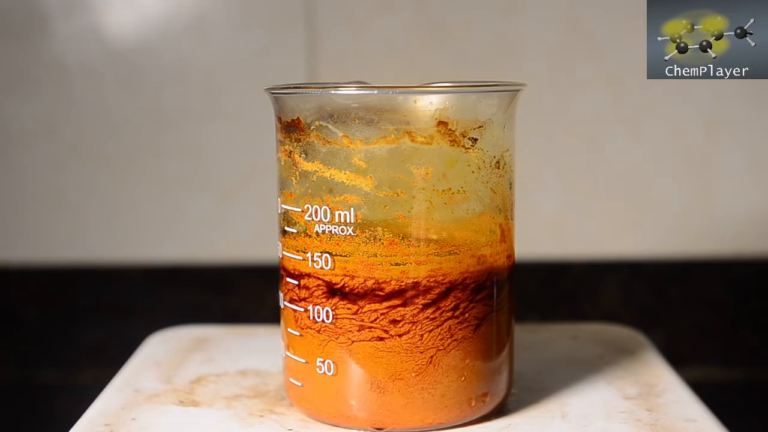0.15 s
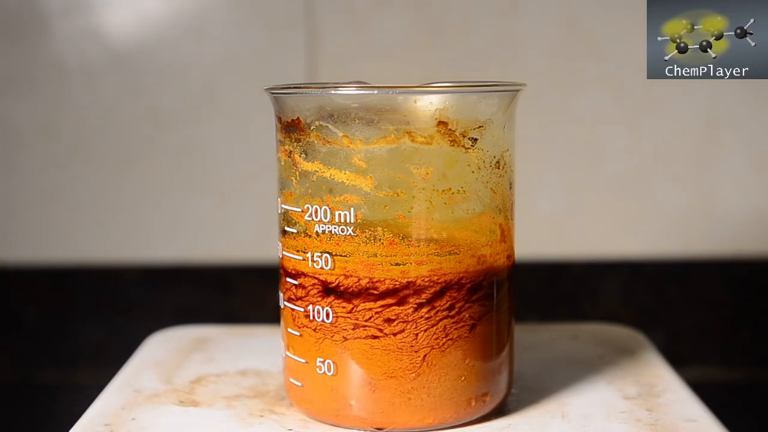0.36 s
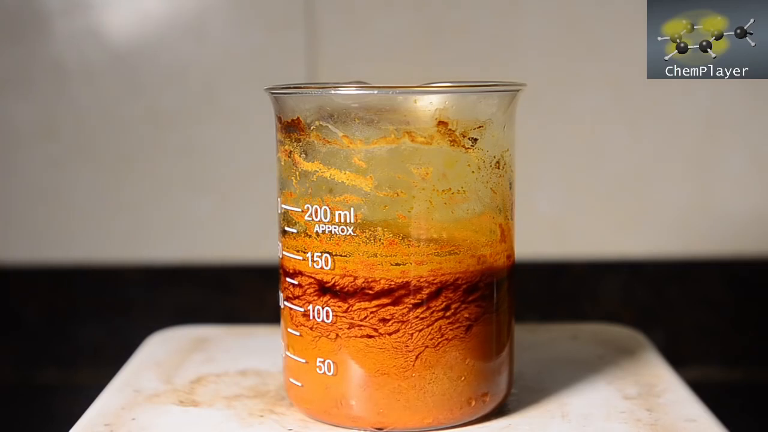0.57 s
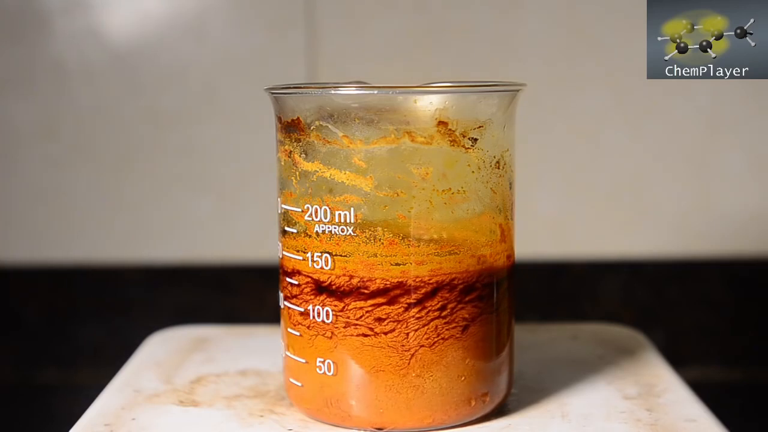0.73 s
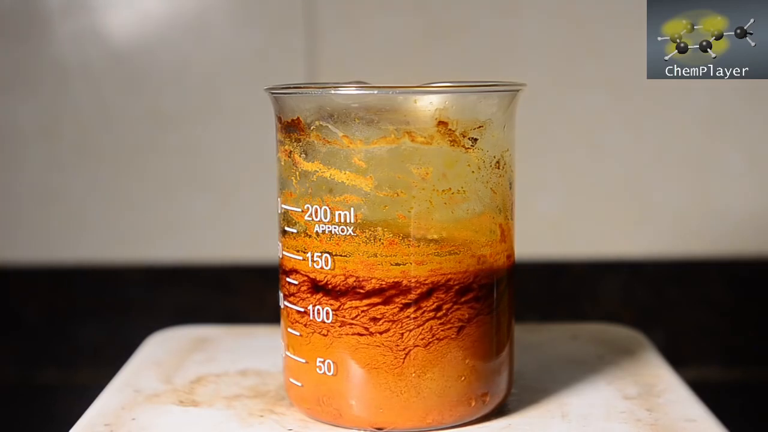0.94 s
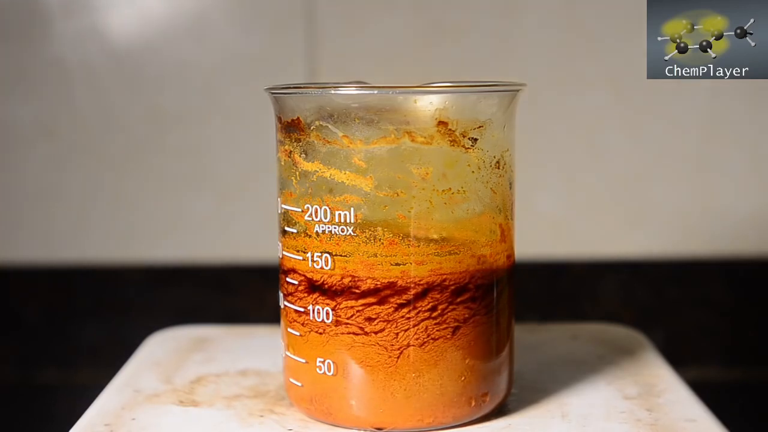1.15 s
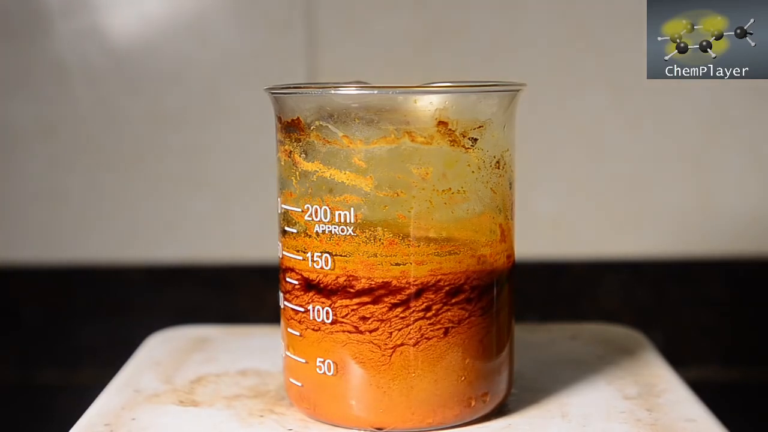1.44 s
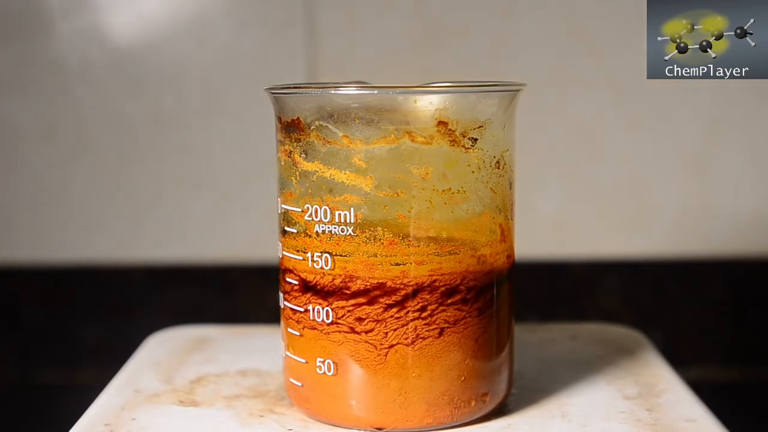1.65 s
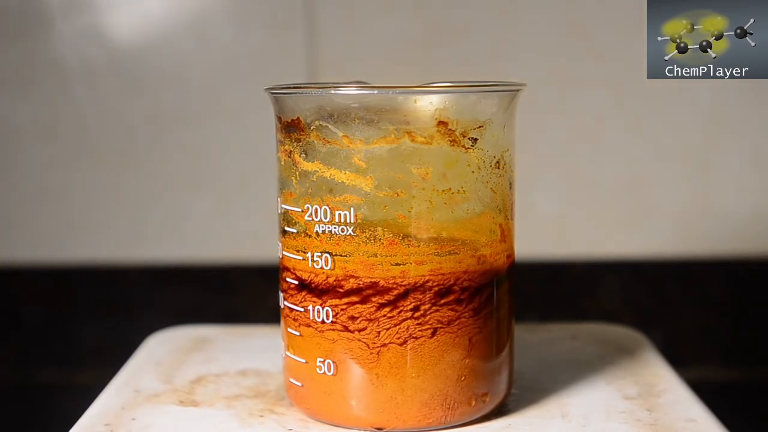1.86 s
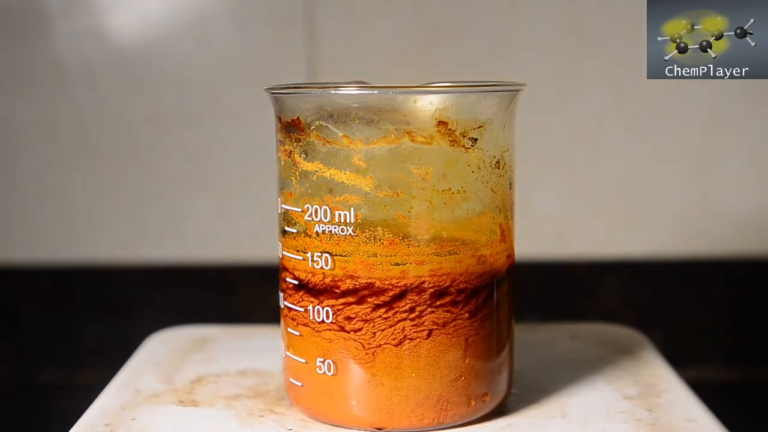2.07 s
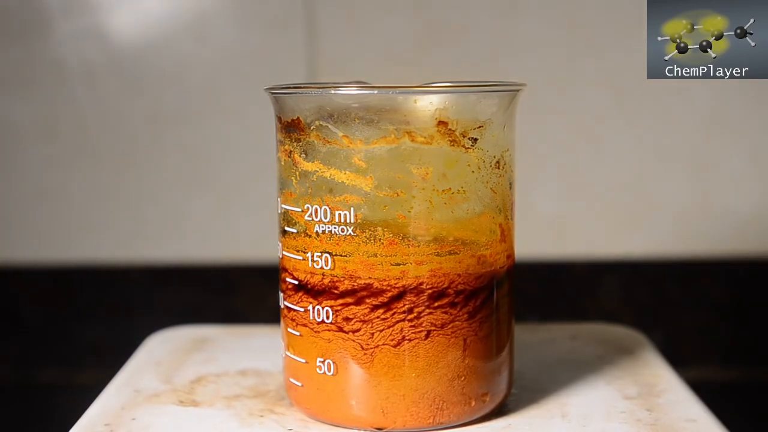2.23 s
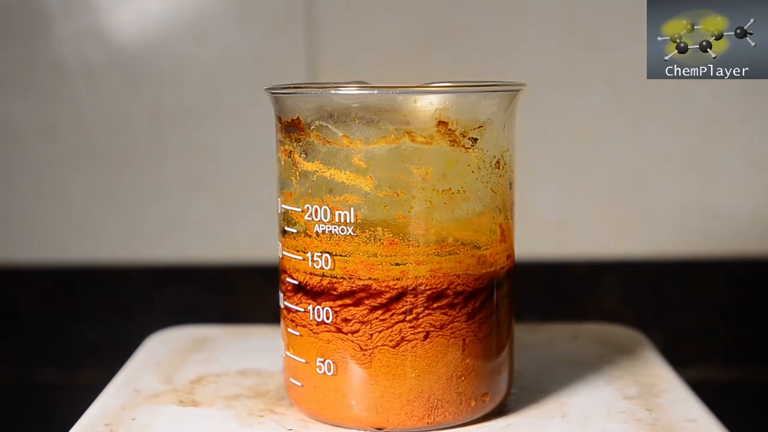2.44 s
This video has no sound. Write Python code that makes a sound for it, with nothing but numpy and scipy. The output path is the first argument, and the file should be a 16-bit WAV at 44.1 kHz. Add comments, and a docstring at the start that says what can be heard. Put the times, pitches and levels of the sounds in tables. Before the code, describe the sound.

Bubbles plop irregularly in a thick liquid in a glass beaker, with faint ticks on the glass and a stirrer motor whirring softly. The motor fades, then one sharp switch click rings briefly in the small room.

```python
"""Bubbles plop in a thick liquid as a magnetic stirrer churns it in a glass beaker on a lab bench.
Each bubble rings briefly and excites the hollow above the liquid; the stir bar ticks on the glass.
The motor whirrs and hums in its housing and its speed control buzzes at twice the mains rate.
Both ease off near the end, where one sharp, switch-like click rings into the small room."""
import sys
import numpy as np
from scipy import signal
from scipy.fft import rfft, irfft, next_fast_len
from scipy.io import wavfile
from scipy.ndimage import map_coordinates

SR = 44100
rng = np.random.default_rng(int(sys.argv[2]) if len(sys.argv) > 2 else 0)


def inscribe(sig):
    """Save sig as 16-bit PCM at rate SR to the path in sys.argv[1].

    A 1-D sig is mono; a 2-D sig holds one channel per row.
    Samples are clipped to [-1, 1] before scaling.
    """
    pcm = np.round(np.clip(np.atleast_2d(sig).T, -1, 1) * 32767)
    wavfile.write(sys.argv[1], SR, pcm.astype(np.int16))


N = 114660


def bubbles():
    """Bubble resonance: each rings with slightly rising pitch and, opening, excites the beaker's hollow."""
    # bubbles: t/s, f/Hz, tone level/dB, lifetime/s, level of the gulp on opening/dB
    plops = [(.001, 970, -30, 0.0085, -36.5), (.135, 1005, -38, 0.0074, -52),
             (.2885, 988, -27, 0.0057, -44), (.54, 1050, -38.5, 0.0061, -39.5),
             (0.564, 1070, -42, .005, -50), (0.6171, 1053, -27.5, 0.0066, -33.5),
             (.722, 1060, -42.5, 0.0065, -58), (.843, 1005, -40, 0.006, -51), (.943, 1070, -41, .005, -53),
             (1.3145, 1060, -31, 0.0053, -37.5), (1.365, 1070, -40.5, 0.0085, -37.5),
             (1.388, 1061, -35.5, 0.016, -43), (1.409, 960, -34, .004, -48), (1.4384, 975, -32, 0.006, -41),
             (1.7315, 1060, -29.5, 0.008, -36), (1.824, 1040, -33, 0.0076, -45),
             (1.842, 980, -38.5, 0.0048, -39), (1.855, 980, -37, 0.0053, -40),
             (1.876, 990, -36, 0.0067, -38), (1.929, 1030, -44, 0.0091, -38.5),
             (1.99, 1000, -43.5, 0.01, -39.5), (2.047, 1600, -47, 0.012, -50),
             (2.066, 613, -42.5, 0.0088, -51), (2.076, 500, -38.5, 0.0083, -47),
             (2.144, 574, -37.5, 0.0054, -49), (2.161, 524, -45, 0.011, -52),
             (2.2313, 1040, -37, 0.0063, -33.5), (2.252, 760, -41, 0.0067, -49),
             (2.339, 910, -45, 0.0068, -45)]
    # modes of the hollow above the liquid: f/Hz, level/dB, T60/s
    cavity_modes = [(527, -7, 0.063), (802, -9, .05), (1316, -6, 0.026), (1613, -3, 0.043),
                    (1840, -10, .025), (2230, -12, 0.023)]
    attack_s, rise_per_s = 0.00073, 2.5
    out, t = np.zeros(N), np.arange(SR // 10) / SR
    onset = 1 - np.exp(-t / attack_s)
    for start, hz, db, life, gulp_db in plops:
        phase = 2 * np.pi * hz * t * (1 + rise_per_s * (t - life) / 2)
        tone = amp(db) * np.sin(phase) * np.exp(-(t / life) ** 2.5)
        gulp = amp(gulp_db - 2) * ring(cavity_modes, t)
        add(out, start, onset * (tone + gulp))
    return out


def stir_bar():
    """Impact excitation: the bar taps the liquid-damped glass, at times with a fine wet spit."""
    # taps: t/s, glass level/dB, contact noise level/dB, spit level/dB
    taps = [(.138, -51.5, -62, -80), (.539, -54, -52, -70), (.632, -64, -60, -59), (.7195, -56, -65, -80),
            (.985, -54, -55, -80), (1.009, -49, -52, -75), (1.219, -57, -48.5, -70),
            (1.243, -53.5, -59, -80), (1.5145, -45.5, -49, -75), (1.855, -62, -55, -58),
            (1.928, -50, -51, -70), (1.989, -62, -51, -66), (2.027, -57, -51, -80),
            (2.294, -56, -48.5, -70), (2.328, -63, -52, -62)]
    # modes of the beaker: f/Hz, level/dB, T60/s
    glass_modes = [(2014, -8, 0.13), (2320, 1, 0.085), (2830, -3, 0.035), (3500, -8, 0.024),
                   (3950, -5, 0.019), (5140, -27, 0.019)]
    # contact noise: f/Hz, spectral level/dB
    contact_spectrum = [(300, -15), (900, 5), (2400, -4), (3700, 1), (4500, -10), (8000, -34), (14000, -45)]
    # wet spit: f/Hz, spectral level/dB
    spit_spectrum = [(2500, -20), (5200, 0), (8000, -1), (12000, -12), (15000, -25)]
    attack_s, contact_t60_s = 0.00034, 0.023
    out, t = np.zeros(N), np.arange(SR // 10) / SR
    onset = 1 - np.exp(-t / attack_s)
    contact, spit = noise(contact_spectrum), noise(spit_spectrum)
    for start, glass_db, contact_db, spit_db in taps:
        burst = (amp(contact_db) * contact + amp(spit_db) * spit)[round(start * SR):][:len(t)]
        crack = burst * amp(-1 - 60 * t / contact_t60_s)
        glass = amp(glass_db) * ring(glass_modes, t)
        add(out, start, onset * (glass + crack))
    return out


def switch_click():
    """Impact and rebound: a switch snaps over with a bright snap, a broad crack and a ringing case."""
    # the blow and its faint rebound: t/s, level/dB
    blows = [(2.408, -19.5), (2.4535, -42)]
    # first snap: f/Hz, spectral level/dB
    snap_spectrum = [(300, -30), (1500, -0.5), (2300, 2.5), (3200, -2.5), (5000, -2.5), (7000, -6),
                     (9000, -9), (10500, -0.5), (11600, -9), (12500, -15), (14500, -20), (15500, -30)]
    # longer crack: f/Hz, spectral level/dB
    crack_spectrum = [(200, -44), (330, -26), (500, -13), (850, -1), (1600, -7), (2000, 2.5), (2550, 8),
                      (3000, -4), (4000, 2.5), (5800, -2), (6600, -4.5), (8000, -3.5), (9000, -11),
                      (10200, -3), (11500, -7.5), (12300, -15), (14400, -23), (15500, -40)]
    # modes of the case: f/Hz, level/dB, T60/s
    case_modes = [(508.4, -13, 0.18), (870, -7, 0.057), (1420, -11, 0.07), (1957, -7.5, 0.047),
                  (2190, -6, 0.074), (2336, -9, 0.088), (2442, -5.5, 0.065), (2600, -8.5, 0.062),
                  (2958, -17.5, 0.18), (3330, -24, 0.24), (3500, -20.5, 0.14), (3860, -7, 0.064),
                  (4550, -17, 0.046), (4968, -22, 0.049), (5410, -14, 0.033), (5570, -14, 0.065)]
    attack_s, snap_t60_s, crack_t60_s = 0.00041, 0.011, 0.054
    out, t = np.zeros(N), np.arange(SR // 4) / SR
    onset = 1 - np.exp(-t / attack_s)
    for start, db in blows:
        snap = noise(snap_spectrum)[:len(t)] * amp(6.5 - 60 * t / snap_t60_s)
        crack = noise(crack_spectrum)[:len(t)] * amp(-1.5 - 60 * t / crack_t60_s)
        case = amp(-3) * ring(case_modes, t)
        add(out, start, amp(db) * onset * (snap + crack + case))
    return out


def motor_whirr():
    """Forced vibration: grainy bearing noise drives the housing's resonances, beside a broad rub."""
    # envelope of the drive: t/s, level/dB
    drive_level = [(0, -52), (1.08, -51.5), (1.55, -51.5), (1.78, -52), (1.92, -54), (2.23, -61.5),
                   (2.38, -72)]
    # housing resonances: f/Hz, bandwidth/Hz, level/dB
    housing_modes = [(420, 33, -5.5), (548.5, 19, 5.5), (808.5, 47, 3.5), (950, 29, -9.5), (1075, 37, -3.5),
                     (1327, 82, -5.5), (1482, 96, -1.5), (1599, 35, 0), (1870, 106, -10),
                     (2044, 190, -10.5), (2293, 24, -5.5), (2637, 114, -12)]
    # rub of the drive: f/Hz, spectral level/dB
    rub_spectrum = [(200, -4), (700, -11), (1150, -10), (1300, 2.5), (1700, 1), (2300, -4), (2450, -12.5),
                    (2750, -13), (3500, -17.5), (5500, -24.5), (9000, -63)]
    housing = lambda f: sum(amp(db) * resonance(f, hz, width) for hz, width, db in housing_modes)
    grains = rng.standard_normal(N) * amp(2 * wobble(150))
    whirr = amp(1) * unit(filtered(grains, housing))
    rub = amp(-6.5) * noise(rub_spectrum)
    return amp(curve(drive_level)) * (whirr + rub)


def motor_hum():
    """Superposition: the motor's hum is a sum of tones, each wavering in level and phase."""
    # envelope of the hum: t/s, level/dB
    hum_level = [(0, 1), (1.68, 0.5), (1.75, -6), (1.95, -16), (2.6, -20)]
    # line spectrum: f/Hz, level/dB
    lines = [(50.2, -82), (150.7, -77), (200.9, -74), (401.8, -75), (602.8, -78), (703.3, -61.5),
             (820, -63), (1415, -64)]
    waver_db, waver_rad = 1, 0.4
    hum, t = np.zeros(N), np.arange(N) / SR
    for hz, db in lines:
        peak = np.sqrt(2) * amp(db + waver_db * wobble(8))
        hum += peak * np.sin(2 * np.pi * hz * t + waver_rad * wobble(8.5))
    return amp(curve(hum_level)) * hum


def speed_control():
    """Periodic excitation: switching pulses ping a coil in each mains half cycle, with a swell of hiss."""
    # load on the control: t/s, level/dB
    load_level = [(0, 1), (1.65, 0), (1.85, -2), (2.0, -5), (2.6, -5)]
    # pulses within one half cycle: delay/s, level/dB
    pulse_group = [(0, 0), (.0034, -10.5), (.0068, -10)]
    # coil resonances: f/Hz, bandwidth/Hz, level/dB, share of the load curve followed (0-1)
    coil_modes = [(3600, 300, -76.5, .3), (7240, 103, -75, 0), (10680, 420, -74.5, 1), (14360, 180, -93, 0)]
    # electrical hiss: f/Hz, spectral level/dB
    hiss_spectrum = [(2000, -8), (3500, -8.5), (4800, -1), (5700, -19), (6500, -14), (9000, -21),
                     (10300, -10), (11300, -12), (13000, -28)]
    mains_hz, first_pulse_s, jitter_s, scatter_db = 50.23, .0026, .00004, 2
    starts = np.arange(first_pulse_s, N / SR, 1 / (2 * mains_hz))
    pulses = np.zeros(N + SR)
    for delay, db in pulse_group:
        times = starts + delay + jitter_s * rng.standard_normal(len(starts))
        pulses[np.round(times * SR).astype(int)] += amp(db + scatter_db * rng.standard_normal(len(starts)))
    coil, load_db = np.zeros(N), curve(load_level)
    for hz, width, db, share in coil_modes:
        two_bandpasses = lambda f: (1.5j * width * f / (hz * hz - f * f + 1.5j * width * f)) ** 2
        coil += amp(db + share * load_db) * unit(filtered(pulses, two_bandpasses))
    cycle = np.cos(4 * np.pi * mains_hz * (np.arange(N) / SR - first_pulse_s))
    hiss = unit(np.exp(.7 * cycle) * noise(hiss_spectrum))
    return coil + amp(-75) * hiss


def in_lab(x, near_db, room_db):
    """Reflection: the direct sound is followed by early echoes, then by the room's reverberation."""
    # decay of the echoes from bench and near walls: f/Hz, T60/s
    near_decay = [(300, 0.052), (2000, 0.079), (12000, 0.013)]
    # reverberation time of the room: f/Hz, T60/s
    room_decay = [(200, 0.27), (2500, 0.7), (7000, 0.48), (14000, 0.29)]
    early = amp(near_db) * echo(x, near_decay, delay_s=.007)
    late = amp(room_db) * echo(x, room_decay, delay_s=.015)
    return x + early + late


def noise_floor():
    """Stationary noise: a faint, steady rush lies under everything."""
    # background: f/Hz, spectral level/dB
    floor_spectrum = [(12, -43), (30, -24), (60, -11), (120, -3.5), (220, 0.5), (380, -1.5), (500, 3.5),
                      (660, -4), (950, 1), (1170, -7.5), (1600, -1.5), (2500, -14), (3600, -15.5),
                      (5300, -21.5), (5700, -30), (6100, -23), (8200, -23), (9400, -28.5), (11800, -34.5),
                      (12800, -34), (14500, -41), (15500, -55)]
    return amp(-55) * noise(floor_spectrum)


def ring(modes, t):
    """Free vibration: damped modes, each with a random starting phase and a slight phase drift."""
    drift_rad, knots_per_s = .6, 120
    knots = np.arange(0, t[-1] + 1 / knots_per_s, 1 / knots_per_s)
    out = np.zeros(len(t))
    for hz, db, t60 in modes:
        phase = 2 * np.pi * (hz * t + rng.random())
        drift = drift_rad * np.interp(t, knots, rng.standard_normal(len(knots)))
        out += amp(db - 60 * t / t60) * np.sin(phase + drift)
    return out


def resonance(f, hz, width):
    """Gain at f of a steep-skirted resonance centred on hz."""
    return 1 / (1 + ((f * f - hz * hz) / (1.5 * width * f + 1e-9)) ** 2)


def echo(x, decay, delay_s):
    """Diffuse field: convolution with a noise tail in which each frequency decays at its own rate."""
    hz, t, spectra = signal.stft(rng.standard_normal(SR // 2), SR, nperseg=128)
    damping = amp(-60 * t / along(decay, hz)[:, None])
    _, tail = signal.istft(spectra * damping, SR, nperseg=128)
    response = np.pad(tail / np.linalg.norm(tail), (round(delay_s * SR), 0))
    return signal.fftconvolve(x, response)[:N]


def noise(spectrum):
    """Spectral shaping: coloured noise of rms 1."""
    return unit(filtered(rng.standard_normal(N), lambda hz: amp(along(spectrum, hz))))


def filtered(x, response):
    """Linear filtering: the spectrum of x times a frequency response."""
    size = next_fast_len(N + SR // 2)
    return irfft(rfft(x, size) * response(np.fft.rfftfreq(size, 1 / SR)), size)[:N]


def wobble(rate):
    """Random modulation: a smooth curve with rate knots a second."""
    knots = rng.standard_normal(int(N * rate / SR) + 4)
    return map_coordinates(knots, [np.arange(N) * rate / SR])


def curve(points):
    """Linear interpolation of (t/s, value) points at every sample."""
    times, values = np.transpose(points)
    return np.interp(np.arange(N) / SR, times, values)


def along(points, hz):
    """Interpolation of (f/Hz, value) points on a logarithmic frequency axis."""
    f, values = np.transpose(points)
    return np.interp(np.log(hz + 1), np.log(f + 1), values)


def add(track, start_s, sound):
    """Superpose a sound on the track from start_s on."""
    part = track[round(start_s * SR):][:len(sound)]
    part += sound[:len(part)]


def amp(db):
    """Decibels to amplitude ratio."""
    return 10 ** (np.asarray(db) / 20)


def unit(x):
    """Normalisation to rms 1."""
    return x / np.sqrt(np.mean(x ** 2) + 1e-20)


def scene():
    """Superposition: beaker and click with their reflections, over the stirrer and the noise floor."""
    beaker = in_lab(bubbles() + stir_bar(), near_db=-11, room_db=-23.5)
    click = in_lab(switch_click(), near_db=-23, room_db=-16)
    stirrer = motor_whirr() + motor_hum() + speed_control()
    return (beaker + click + stirrer + noise_floor())[None]


def record(dry):
    """Band limiting: an ideal low-pass removes the highest treble."""
    cutoff_hz = 15300
    return filtered(dry[0], lambda hz: hz < cutoff_hz)[None]


dry = scene()
out = record(dry)
inscribe(out)
```